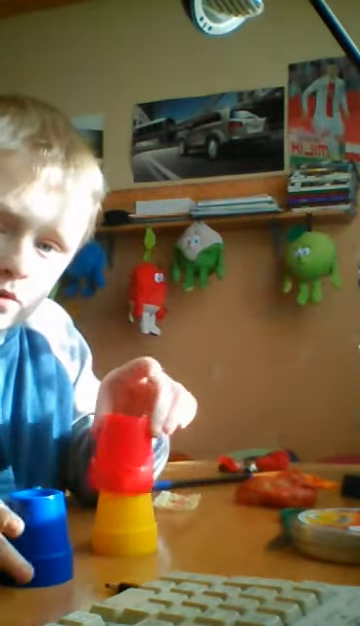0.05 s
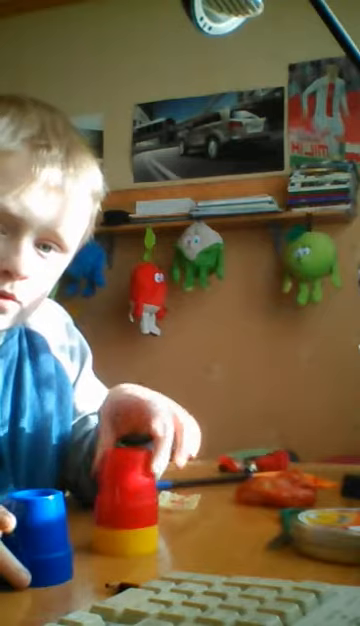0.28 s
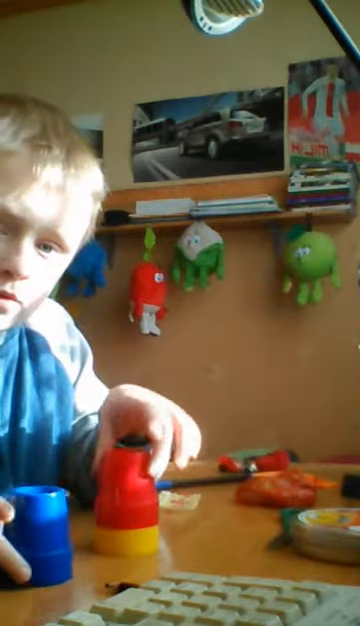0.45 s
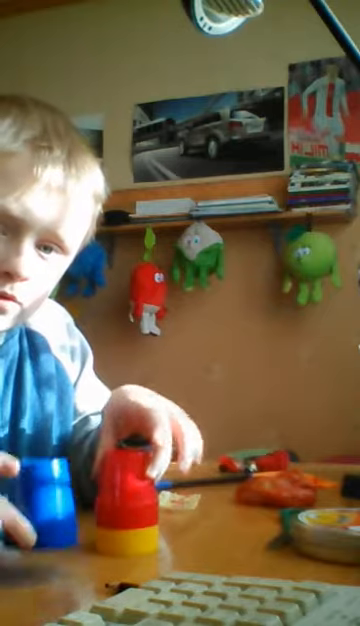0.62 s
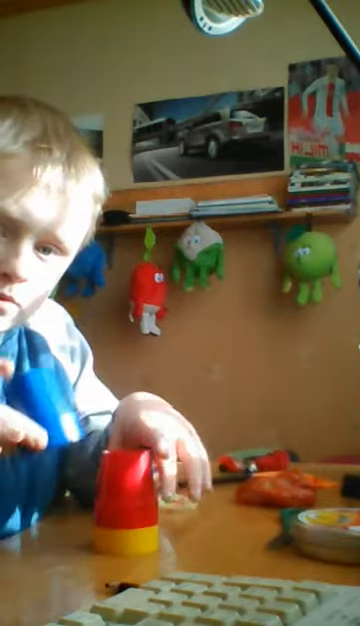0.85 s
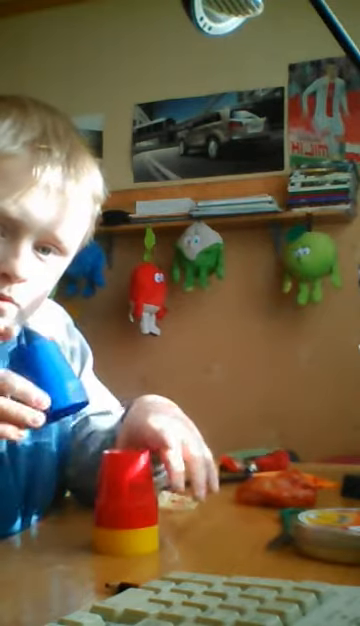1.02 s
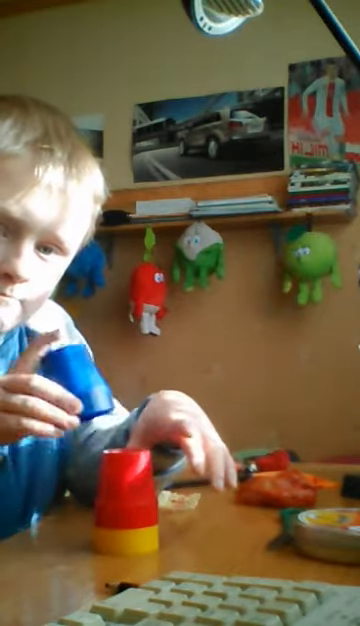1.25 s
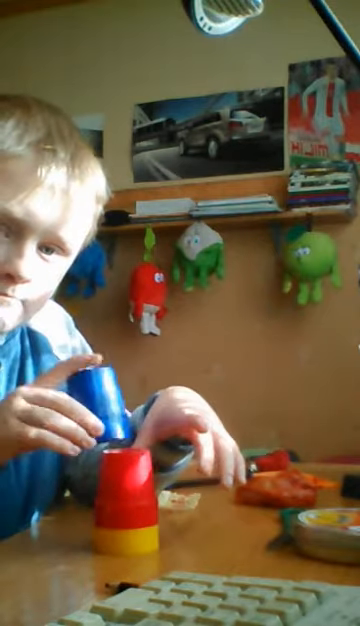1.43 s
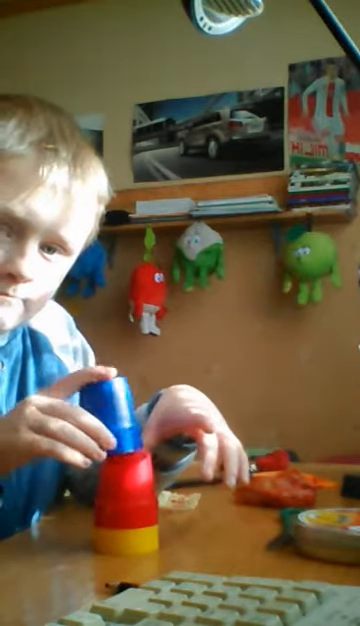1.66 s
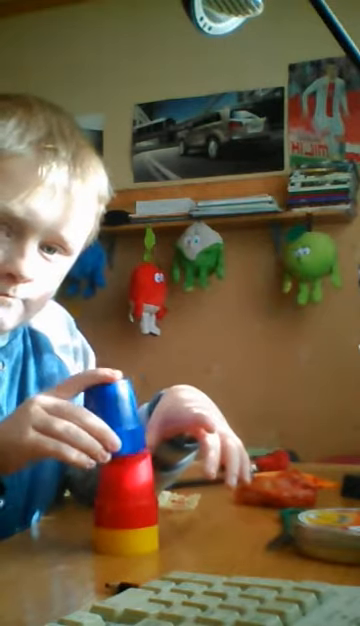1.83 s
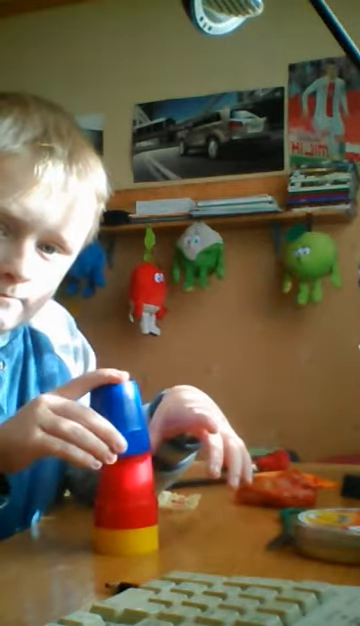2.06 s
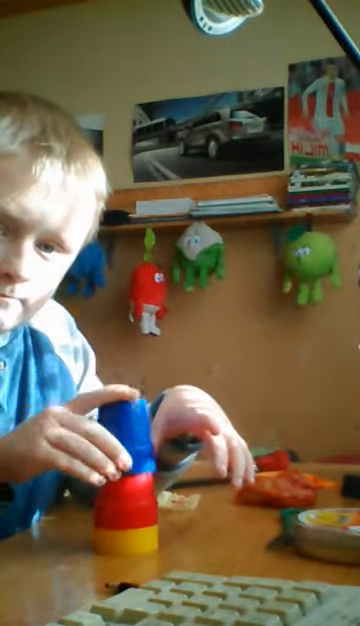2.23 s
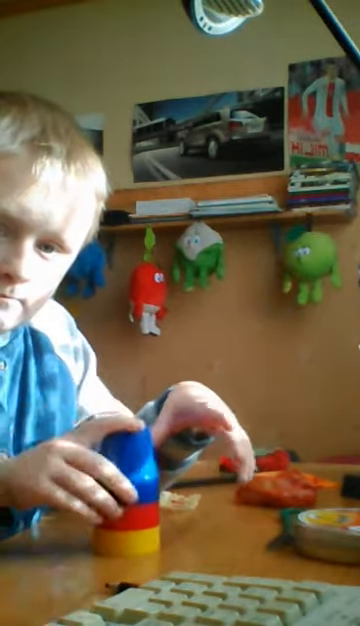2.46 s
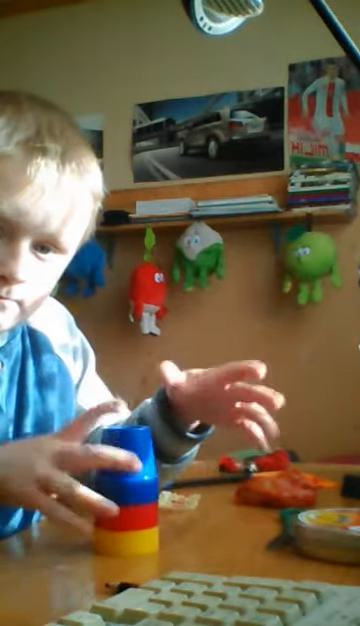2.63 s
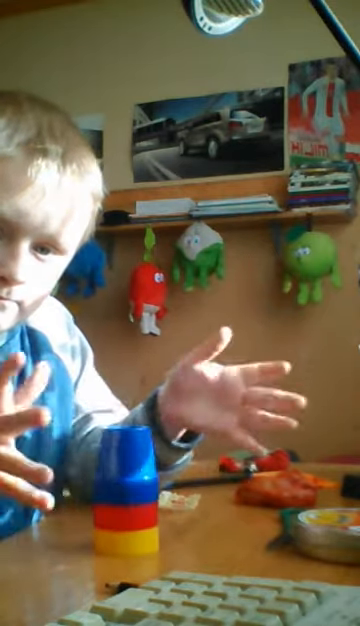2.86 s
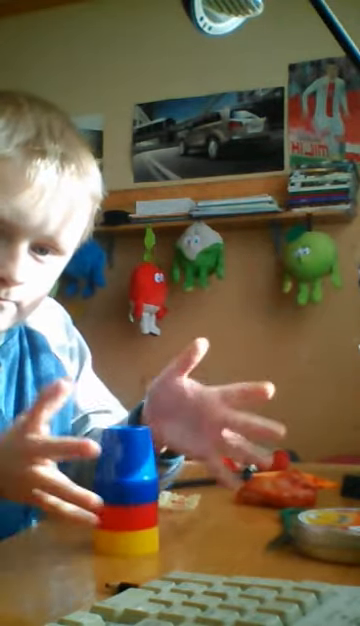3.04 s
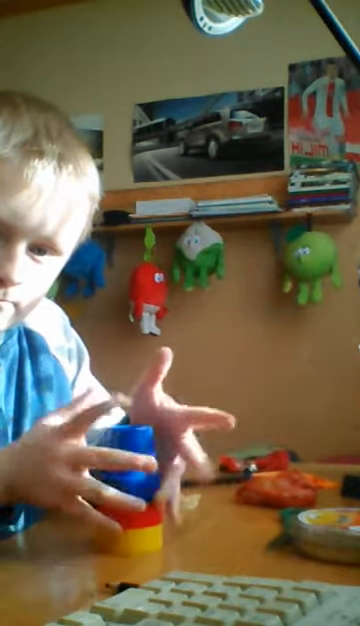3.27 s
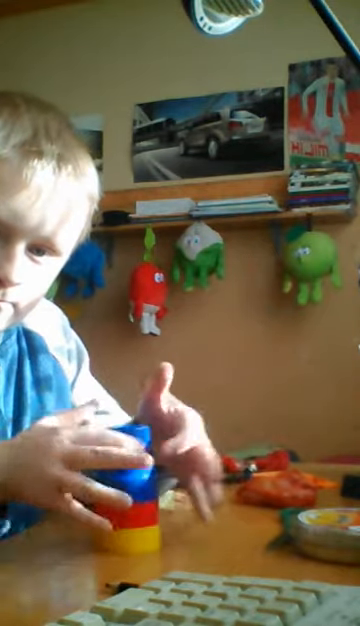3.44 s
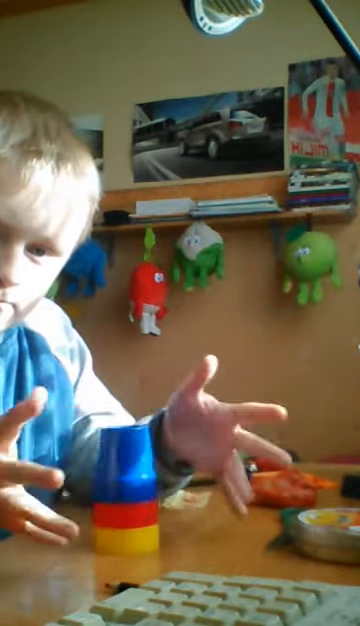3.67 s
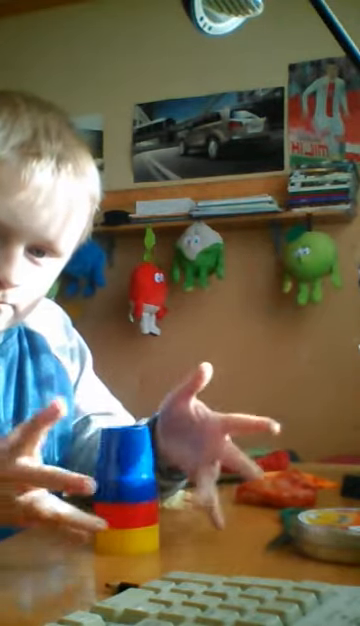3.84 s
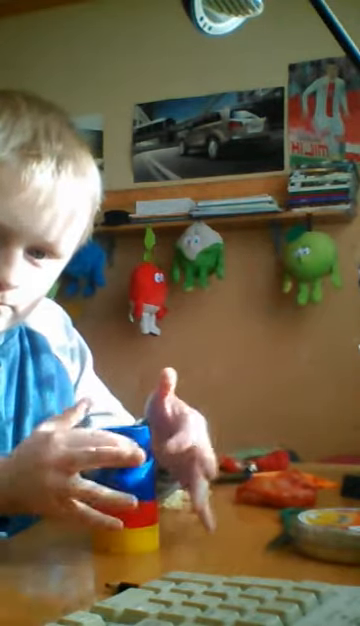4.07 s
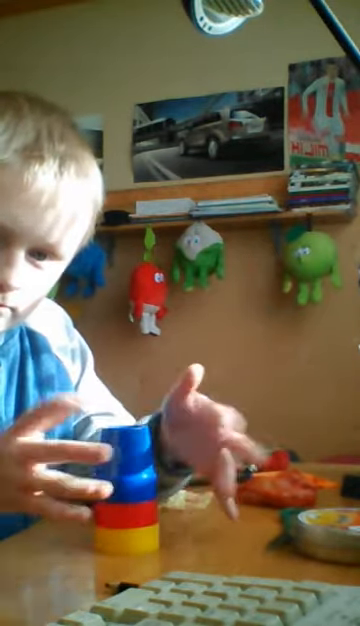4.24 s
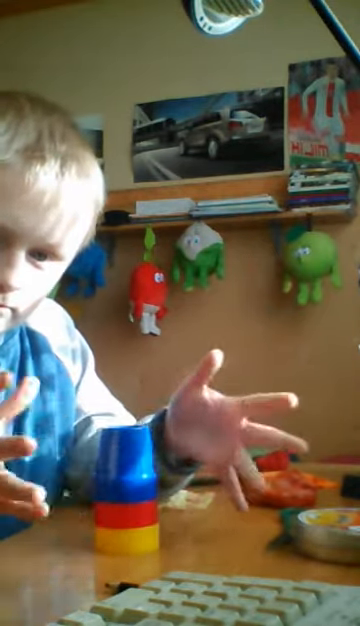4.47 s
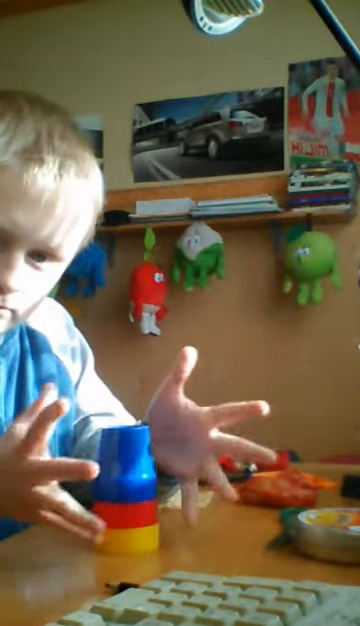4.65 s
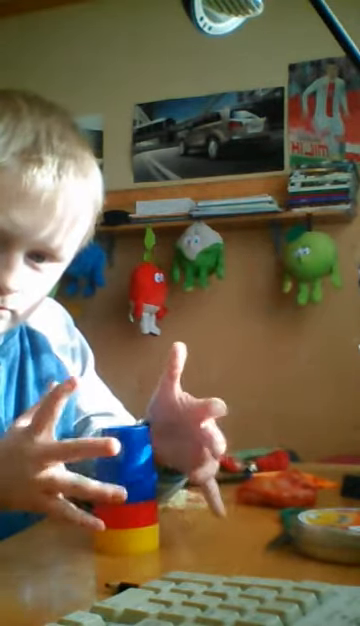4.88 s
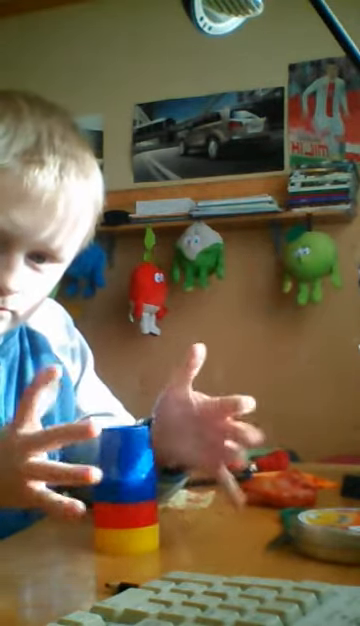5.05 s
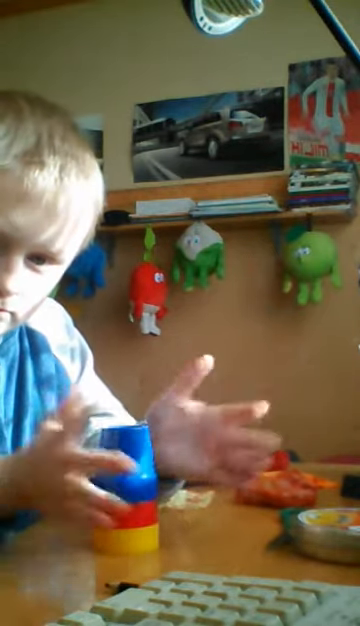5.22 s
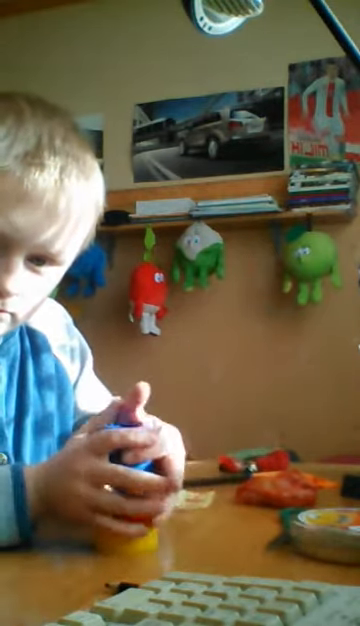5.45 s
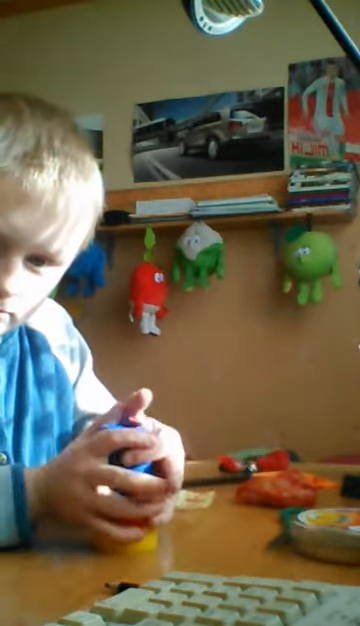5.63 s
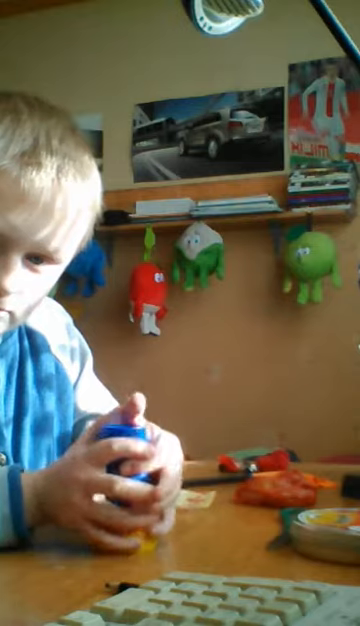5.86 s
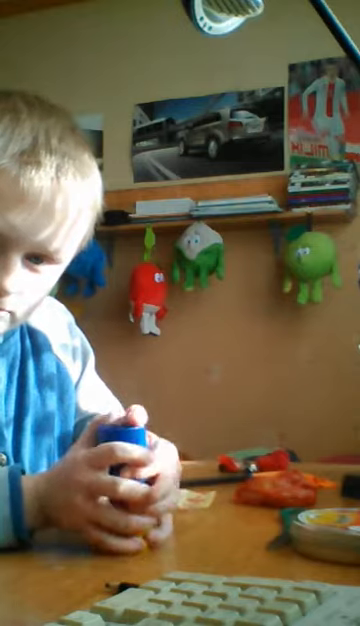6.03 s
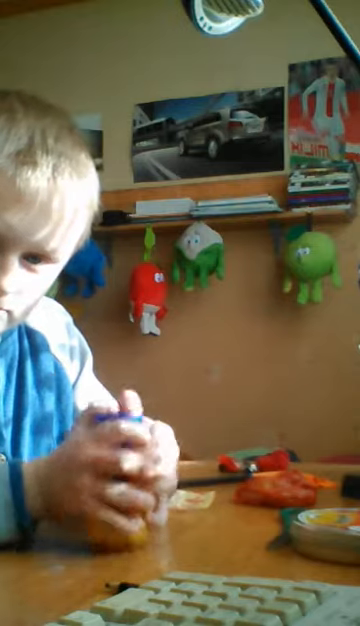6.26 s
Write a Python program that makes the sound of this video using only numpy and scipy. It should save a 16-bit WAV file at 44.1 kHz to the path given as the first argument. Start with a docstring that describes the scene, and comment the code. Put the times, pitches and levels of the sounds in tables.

```python
"""Plastic cups on a desk

Three plastic cups are dropped onto one another, patted, slapped and pushed together on a wooden desk
in a small room. Each knock is a quick run of fading rebounds that ring the thin walls and rims and
thump the desk. The gripped stack rattles and judders; sleeves and fingers rub between the knocks,
and a clock ticks faintly once a second."""
import sys
import numpy as np
from scipy import signal
from scipy.fft import irfft
from scipy.io import wavfile
from scipy.ndimage import uniform_filter1d

SR = 44100
rng = np.random.default_rng(int(sys.argv[2]) if len(sys.argv) > 2 else 0)


def wav_record(signal):
    """Record a signal, one row per channel, as 16-bit PCM in the file named by sys.argv[1]."""
    frames = np.transpose(np.atleast_2d(signal))
    bounded = np.clip(frames, -1, 1)
    # unit amplitude maps onto the largest positive 16-bit level
    quanta = np.round(bounded * 32767).astype(np.int16)
    wavfile.write(sys.argv[1], SR, quanta)


N = 277830
TIME = np.arange(N) / SR
IMPACT_S = .0053  # the opening of a contact, over which its level is set


# The knocks. Each row: start in seconds, level in dB, centre of the favoured wall modes in Hz,
# ring time as a factor, change per rebound in dB, then desk thump, brightness of edges and rims,
# and room send, all three in dB against the level.
CUP_KNOCKS = [(0.2795, -26.5, 1120, 1.06, -29, -26, -18, -28),
              (0.2861, -23.5, 1200, 1.25, -8, -21.5, -13.5, -14.5),
              (0.3454, -21, 1380, 0.39, -7.5, -28, -18, -19), (0.456, -44, 713, 0.98, -22, -15, -23.5, -16),
              (1.548, -21.5, 1330, 0.57, -16, -19.5, -19.5, -11),
              (2.067, -44.5, 1190, 1.7, -16, -12, -30, -28), (2.208, -40.5, 1270, 1.6, -22, -21, -15, -18),
              (2.3321, -27.5, 940, 2.8, -12, -22, -15.5, -24),
              (2.3503, -14.5, 1290, 1.33, -8, -19.5, -13, -20.5),
              (2.3658, -21, 1050, 0.75, -5.5, -18, -8, -8.5),
              (2.544, -38, 1500, .65, -18, -20, -20.5, -9.5), (3.1445, -36.5, 1030, .6, -4, -14, -26, -12),
              (3.2594, -39, 1230, 0.93, -9.5, -10, -24, -15.5),
              (5.2921, -28.5, 1370, 1.1, -19, -16, -10.5, -0.5),
              (5.2995, -15, 1140, 0.93, -5.5, -16.5, -6, -15.5),
              (5.333, -30, 1310, 2.3, -7, -11.5, -11, -24), (5.421, -34, 1130, 0.96, -23, -13, -24.5, -20),
              (5.81, -46.5, 900, 1, -3, -6.5, -17, -10)]


def knocks(contacts=4, gap_s=.0063):
    """A cup rebounds, each contact weaker and deeper, with a larger share of thump, crack and room."""
    for start, db, centre_hz, ring_time, rebound_db, thump_db, bright_db, room_db in CUP_KNOCKS:
        for k in range(contacts):
            yield start + k * gap_s, contact(db + k * rebound_db, centre_hz * .88 ** k, ring_time,
                                             thump_db + 1.5 * k, bright_db + 1.5 * k, room_db + 2.5 * k)


def contact(db, centre_hz, ring_time, thump_db, bright_db, room_db):
    """One contact drives walls, edges, rims and desk; returns the close sound and its room send."""
    facing = unit(soften(favour(walls(ring_time), centre_hz), db), IMPACT_S)
    bright = amp(bright_db) * (edges(ring_time) + amp(-1) * rims(ring_time))
    thump = amp(thump_db) * desk(ring_time)
    scattered = amp(1) * walls_all_round(ring_time, centre_hz)
    return amp(db) * (facing + bright + thump), amp(db + room_db) * (scattered + bright + thump)


# Modes of the cup walls and the air inside. Each row: pitch in Hz, relative level in dB,
# base t60 in seconds (the time to fade by 60 dB, which a contact's ring time scales).
WALL_MODES = [(557, -9.5, 0.078), (621.4, -11, 0.073), (678, -9, 0.092), (768, -18.5, 0.033),
              (860, -13.5, 0.073), (1057, -3, 0.048), (1178, -14.5, 0.048), (1318, -11.5, .04),
              (1497, -1.5, 0.04), (1747, -1.5, 0.01986), (1827, -8.5, 0.035), (2087, 0.5, 0.024),
              (2337, -8.5, 0.036), (2447, -9.5, .045), (2680, -14.5, .04)]
# The walls' crack. Each row: frequency in Hz, relative level in dB.
WALL_COLOUR = [(200, -33), (450, -15.5), (650, -1), (1100, -3), (1600, 0), (2300, -4.5), (2800, -23.5),
               (4000, -50)]


def walls(ring_time):
    """The thin walls give the hollow body of the knock."""
    return crack(WALL_COLOUR, t60=.021 * ring_time) + amp(2) * ring(WALL_MODES, ring_time)


def walls_all_round(ring_time, centre_hz):
    """The room hears all sides of the walls, so no single mode stands out there."""
    burst = favour(crack(WALL_COLOUR, t60=.019 * ring_time), centre_hz, rest_db=-6, q=1.5)
    return bandpass(unit(burst, IMPACT_S), 380, 2500)


def favour(x, hz, rest_db=-11, q=2.0):
    """The spot and the softness of a contact favour one region of the wall's modes."""
    band = signal.lfilter(*signal.iirpeak(hz, q, fs=SR), x)
    return band + amp(rest_db) * (x - band)


def soften(x, db, firm_db=-30, firm_attack_s=.0015, firm_top_hz=3200):
    """A gentler contact lasts longer: it starts more slowly and reaches less far up the wall's modes."""
    softness = amp(.5 * (firm_db - db))
    top_hz = np.clip(firm_top_hz / np.sqrt(softness), 1000, 4500)
    onset = np.minimum(TIME[1:len(x) + 1] / (firm_attack_s * softness), 1)
    return bandpass(x, 400, top_hz) * onset


# Edge modes. Each row: pitch in Hz, relative level in dB, base t60 in seconds.
EDGE_MODES = [(2763, -3, 0.019), (3240, -5, 0.043), (3755, -3.5, 0.0511), (4477, -10.5, 0.022),
              (5590, -11.5, 0.026)]
# The edges' crack. Each row: frequency in Hz, relative level in dB.
EDGE_COLOUR = [(1800, -18.5), (2550, 4), (3200, -1), (3800, -3), (4500, -3.5), (6000, -6.5), (7500, -22)]


def edges(ring_time):
    """The stiff edges add a hard clack."""
    clack = crack(EDGE_COLOUR, t60=.036 * ring_time) + amp(-4) * ring(EDGE_MODES, ring_time)
    return unit(bandpass(clack, 2200, 6300), IMPACT_S)


# Rim modes. Each row: pitch in Hz, relative level in dB, base t60 in seconds.
RIM_MODES = [(7020, -0.5, 0.1), (7470, -3, .08), (7530, -2, 0.053), (7970, -5, .05), (8200, -2, 0.016)]
# The rims' crack. Each row: frequency in Hz, relative level in dB.
RIM_COLOUR = [(5000, -30), (6600, -0.5), (7500, 0), (8800, -3.5), (10000, -10), (11000, -25), (12500, -30)]


def rims(ring_time):
    """The rims ring highest, a thin click on top."""
    click = crack(RIM_COLOUR, t60=.04 * ring_time) + amp(-3) * ring(RIM_MODES, ring_time)
    return unit(bandpass(click, 4100, 10500), IMPACT_S)


# Desk top modes. Each row: pitch in Hz, relative level in dB, base t60 in seconds.
DESK_MODES = [(124, -5.5, 0.11), (187, -10, 0.111), (240, 2.5, 0.098), (287, -9, 0.049),
              (373.6, -4.5, 0.12)]
# The desk's dull thud. Each row: frequency in Hz, relative level in dB.
DESK_COLOUR = [(60, -21.5), (90, -14.5), (130, -1), (190, -6), (245, 0), (310, -5), (380, -9), (500, -5),
               (800, -25.5)]


def desk(ring_time):
    """The wooden top takes the blow with a low thump."""
    thump = crack(DESK_COLOUR, t60=.071 * ring_time) + ring(DESK_MODES, ring_time)
    return unit(bandpass(thump, 140, 580), 2 * IMPACT_S)


def crack(colour, t60, hold_s=.0048):
    """Dense, quickly damped modes: a burst of noise that holds while the contact chatters, then dies."""
    t = TIME[:SR // 7]
    return noise(colour, len(t)) * amp(-60 * np.maximum(t - hold_s, 0) / t60)


# Reflections off desk, keyboard and lamp. Each row: mean delay in seconds, gain as a factor.
NEAR_ECHOES = [(.0017, .3), (.0035, -.25), (.0053, .3), (.0072, .2)]


def ring(modes, ring_time, detune=.0042):
    """The clear modes of one part, with their echoes from things close by."""
    t = TIME[:SR // 7]
    hz, db, t60 = np.transpose(modes)[:, :, None]
    hz = hz * (1 + detune * rng.standard_normal(hz.shape))  # the grip shifts each mode a little
    polarity = (-1) ** np.arange(len(modes))[:, None]
    decay = amp(db - 60 * t / (t60 * ring_time))
    direct = (polarity * decay * np.cos(2 * np.pi * hz * t)).sum(0)
    out = direct.copy()
    for delay, gain in NEAR_ECHOES:
        add(out, delay * rng.uniform(.9, 1.1), gain * direct)
    return unit(out, span_s=.0047)


# The rattles. Each row: start and end in seconds, mean level in dB, contacts per second.
CUP_RATTLES = [(1.773, 1.842, -55.5, 59), (2.429, 2.53, -50.5, 36), (3.185, 3.31, -54, 22),
               (4.125, 4.162, -63.5, 59), (5.72, 5.9, -58, 48)]


def rattles(spread_db=3):
    """Loose cups rattle under the fingers: light contacts, uneven in timing and strength."""
    for start, end, db, rate in CUP_RATTLES:
        for beat in np.arange(start, end, 1 / rate):
            late = .5 * rng.random() / rate
            yield beat + late, contact(db + spread_db * rng.standard_normal(), centre_hz=970,
                                       ring_time=.87, thump_db=-9.5, bright_db=-20.5, room_db=-9.5)


# The level curve of the judder. Each row: time in seconds, level in dB.
JUDDER_CURVE = [(5.575, -64), (5.601, -61.5), (5.625, -54), (5.745, -60)]


def judder(slips_per_s=54, jitter=.15, push_hz=205, push_t60=.05):
    """The gripped stack sticks and slips, each soft slip giving the desk a short low push."""
    times, db = np.transpose(JUDDER_CURVE)
    rate = slips_per_s * (1 + jitter * wander(600))
    slips = np.diff(np.floor(np.cumsum(rate) / SR), prepend=0)  # one impulse a slip
    strength = amp(np.interp(TIME, times, db)) * (TIME > times[0]) * (TIME < times[-1])
    t = TIME[:SR // 10]
    push = np.sin(2 * np.pi * push_hz * t) * amp(-60 * t / push_t60)
    return signal.oaconvolve(slips * strength, unit(push, 1 / slips_per_s))[:N]


# Strokes of sleeve or fingers. Each row: start and end in seconds, level in dB, hiss in dB against it.
STROKES = [(0, 0.328, -66, -2.5), (.33, 1.005, -68, -19), (1.139, 1.272, -61.5, -10),
           (1.358, 1.566, -47.5, -7), (1.65, 2.097, -64.5, -25), (2.05, 2.347, -58, -7),
           (2.374, 2.556, -49.5, -6), (3.13, 3.25, -56.5, -7.5), (3.358, 3.467, -60, -12),
           (3.874, 4.17, -76.5, 6.5), (5.217, 5.33, -69, 8), (5.59, 5.909, -66, -5.5),
           (5.915, 6.274, -70.5, -8.5)]
# A stroke's dull body and its thin hiss. Each row: frequency in Hz, relative level in dB.
BODY_COLOUR = [(80, -23.5), (200, -10.5), (400, -6), (700, 1), (1100, 0.5), (1500, 0.5), (2000, -9),
               (2700, -14.5), (4500, -17.5), (7000, -28.5), (10000, -41.5)]
HISS_COLOUR = [(2900, -15), (5200, -12), (6500, -12), (7800, -6.5), (9000, -13.5), (10200, -25),
               (11500, -27.5)]


def rubbing(catch_db=1.0, pressure_db=.76, rise_s=.045, fall_s=.036):
    """Cloth and skin slide over desk and cups, catching unevenly and swelling with the pressure."""
    body, hiss = np.zeros((2, N))
    for start, end, body_db, hiss_db in STROKES:
        stroke = np.clip(np.minimum((TIME - start) / rise_s, (end - TIME) / fall_s), 0, 1)
        body += amp(body_db) * stroke
        hiss += amp(body_db + hiss_db) * stroke
    friction = amp(catch_db * wander(200) - pressure_db * wander(2000))
    return friction * (body * noise(BODY_COLOUR, N) + hiss * noise(HISS_COLOUR, N))


def room(send, crossfade_hz=47):
    """The room's reverberation: the send crossfades quickly between two tails for a smooth decay."""
    phase = 2 * np.pi * crossfade_hz * TIME
    return sum(signal.fftconvolve(send * share, tail())[:N] for share in (np.cos(phase), np.sin(phase)))


# The small room's decay. Each row: frequency in Hz, t60 in seconds.
ROOM_DECAY = [(150, 0.66), (400, 0.57), (1040, 0.45), (2760, 0.37), (7280, 0.34), (12000, 0.19)]


def tail(build_s=.0062, treble_db=3.5):
    """A diffuse tail that builds up quickly, each band dying at its own speed."""
    hz, t, bands = signal.stft(rng.standard_normal(SR * 3 // 4), SR, nperseg=256)
    colour_db = curve_at([(2000, 0), (7000, treble_db)], hz)[:, None]
    decay_db = -60 * t / curve_at(ROOM_DECAY, hz)[:, None]
    _, out = signal.istft(bands * amp(colour_db + decay_db), SR, nperseg=256)
    out *= np.minimum(TIME[:len(out)] / build_s, 1)
    return out / np.linalg.norm(out)


# The tick's colour. Each row: frequency in Hz, relative level in dB.
CLOCK_COLOUR = [(600, -27), (1400, 3.5), (2600, -10.5), (3800, -1.5), (5200, -5.5), (7000, 1.5), (9200, -3),
                (10200, -14), (11500, -32)]


def clock(first_s=.627, db=-51.5, rise_s=.019, t60=.23):
    """Once a second, a faint clock tick, played as a soft puff of treble."""
    out, t = np.zeros(N), TIME[:SR // 2]
    puff = amp(db - 60 * t / t60) * np.minimum(t / rise_s, 1)
    for start in np.arange(first_s, N / SR):
        add(out, start, puff * noise(CLOCK_COLOUR, len(t)))
    return out


# The room tone. Each row: frequency in Hz, relative level in dB.
HUSH_COLOUR = [(25, -41), (36, -5.5), (50, 2.5), (90, -5.5), (135, -3), (250, -8), (600, -12.5),
               (1500, -17), (3000, -20.5), (5500, -21.5), (8000, -17), (10000, -22), (11300, -39.5),
               (12400, -50.5)]


def hush(air_db=-66, hum_db=-72, hum_hz=50):
    """Steady room air, microphone hiss and a trace of mains hum."""
    return amp(air_db) * noise(HUSH_COLOUR, N) + amp(hum_db) * np.sin(2 * np.pi * hum_hz * TIME)


def noise(colour, size):
    """Noise of rms 1 with the given spectrum, falling away beyond its ends."""
    hz = np.fft.rfftfreq(size, 1 / SR)
    low_cut = hz / (hz + colour[0][0] / 2)
    high_cut = 1 / (1 + (hz / colour[-1][0] / 2) ** 4)
    phase = np.exp(2j * np.pi * rng.random(len(hz)))
    return unit(irfft(amp(curve_at(colour, hz)) * low_cut * high_cut * phase, size))


def wander(samples):
    """A random drift of rms 1, smoothed over so many samples."""
    return unit(uniform_filter1d(rng.standard_normal(N), size=samples))


def bandpass(x, low_hz, high_hz):
    """Each part radiates well only in its own range."""
    return signal.sosfilt(signal.butter(2, [low_hz, high_hz], "band", fs=SR, output="sos"), x)


def curve_at(points, hz):
    """Interpolates a table on a log-frequency axis."""
    point_hz, value = np.transpose(points)
    return np.interp(np.log(hz + 1), np.log(point_hz + 1), value)


def amp(db):
    """Turns dB into gain."""
    return 10 ** (np.asarray(db) / 20)


def unit(x, span_s=None):
    """Scales to rms 1, over the whole sound or over its first span_s seconds."""
    head = x if span_s is None else x[:int(span_s * SR)]
    return x / np.sqrt(np.mean(head ** 2) + 1e-20)


def add(mix, start_s, sound):
    """Lays a sound into the mix."""
    part = mix[max(round(start_s * SR), 0):][:len(sound)]
    part += sound[:len(part)]


def scene(handling_room_db=-7):
    """Knocks and handling close by, answered by the room, over the clock and the room tone."""
    handling = judder() + rubbing()
    background = clock() + hush()
    close, send = np.zeros((2, N))
    for start, (near, scattered) in [*knocks(), *rattles()]:
        add(close, start, near)
        add(send, start, scattered)
    reverb = room(send + amp(handling_room_db) * handling)
    return (close + handling + reverb + background)[None]


def record(dry, ceiling=.41, top_hz=11100, cut_hz=12400):
    """The small microphone rounds off the hardest peaks and loses the top treble; a steep cut follows."""
    rounded = ceiling * np.tanh(dry / ceiling)
    dulled = signal.sosfilt(signal.butter(10, top_hz, fs=SR, output="sos"), rounded)
    steep_cut = signal.firwin(511, cut_hz, window=("kaiser", 9), fs=SR)
    return signal.oaconvolve(dulled, steep_cut[None], "same")


dry = scene()
out = record(dry)
wav_record(out)
```